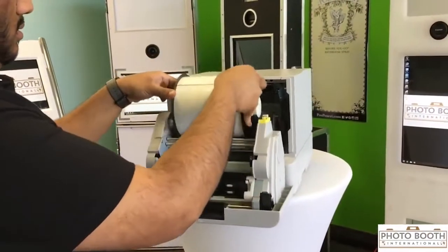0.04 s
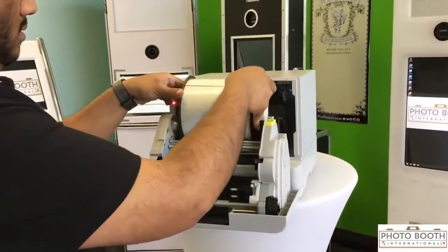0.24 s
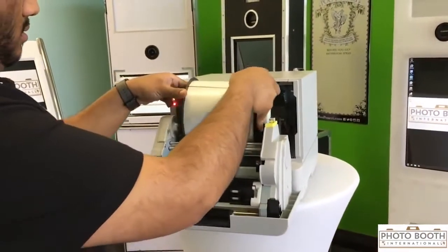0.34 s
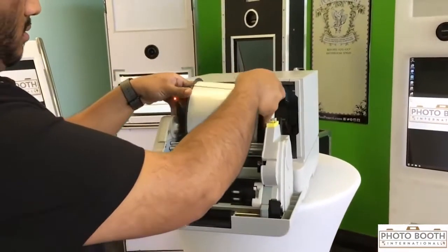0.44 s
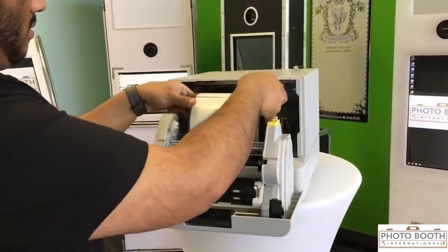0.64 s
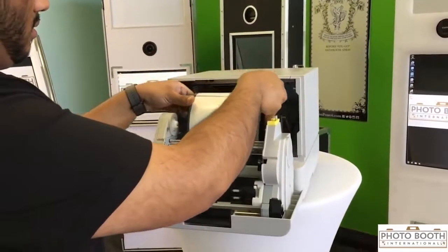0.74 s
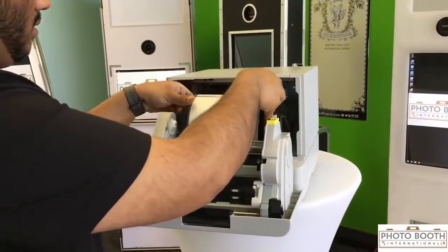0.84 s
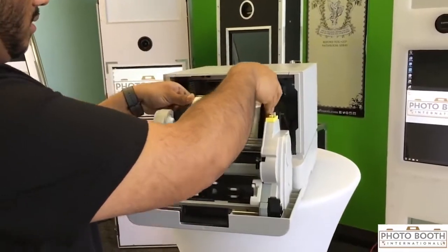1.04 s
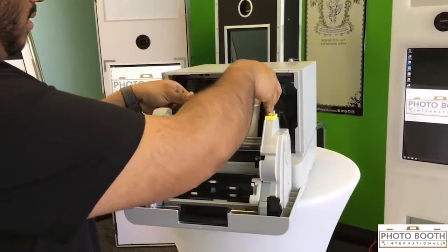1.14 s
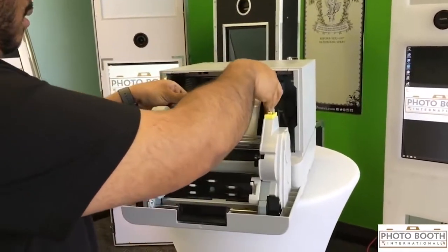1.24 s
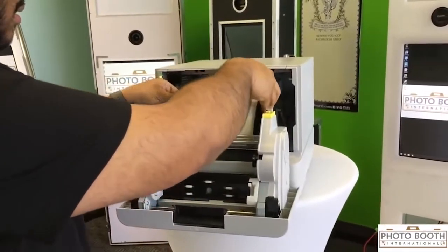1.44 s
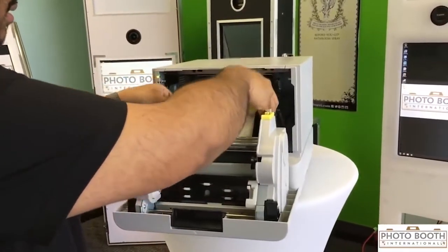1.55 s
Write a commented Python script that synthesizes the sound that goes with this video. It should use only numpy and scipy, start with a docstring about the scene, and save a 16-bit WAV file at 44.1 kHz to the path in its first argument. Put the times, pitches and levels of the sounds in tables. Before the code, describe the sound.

Plastic clacks sound in a small room as a paper roll is lowered into a printer. It seats with a sharp snap and a low bump, then hands nudge it with soft taps and faint squeaking, over quiet ventilation.

```python
"""Small showroom: a paper roll on plastic flanges is lowered into a printer.
The flanges clack twice against the guides, then the roll drops into its seat with a loud snap and a
rumble of the case. Each clack is a noise crack plus ringing plastic modes. Hands nudge the roll home
with light taps, a stick-slip creak and a thin squeak, over the hum of ventilation."""
import sys
import numpy as np
from scipy import signal
from scipy.fft import rfft, irfft
from scipy.io import wavfile
from scipy.ndimage import uniform_filter1d

SR = 44100
rng = np.random.default_rng(int(sys.argv[2]) if len(sys.argv) > 2 else 0)


def inscribe(sig):
    """Save sig as 16-bit PCM at rate SR to the path in sys.argv[1].

    A 1-D sig is mono; a 2-D sig holds one channel per row.
    Samples are clipped to [-1, 1] before scaling.
    """
    pcm = np.round(np.clip(np.atleast_2d(sig).T, -1, 1) * 32767)
    wavfile.write(sys.argv[1], SR, pcm.astype(np.int16))


N = 70560
SIZE = 2 ** 14   # samples per impact
T_S = np.arange(N) / SR
AGE_S = T_S[:SIZE]
BINS_HZ = np.maximum(np.arange(SIZE // 2 + 1) * SR / SIZE, 1)
CUTOFF_HZ = 15800
CONTACT_RISE_S = .0014   # bumps and taps

# air noise spectrum: f/Hz, relative level/dB
AIR_SPECTRUM = [(25, -28), (50, -5), (70, 0), (105, -7), (260, -9), (400, -17), (1000, -21), (2000, -31),
                (4000, -35.5), (8000, -45), (15000, -50)]
# ventilation tones: f/Hz, level/dB
HUM_TONES = [(76, -55), (163, -62), (241, -56)]
# roll on case: t/s, level/dB, low-pass f/Hz
BUMPS = [(.001, 4, 200), (.168, 5, 600), (.246, -4, 300), (.624, 11, 130), (.664, 6.5, 520), (.765, 2, 100)]
# light flange taps: t/s, decay/s, knock/dB, body/dB, tick/dB, hollow ring f/Hz
TAPS = [(.0142, .003, -11, -18, -7, 560), (.1625, .004, -6, -17, -20, 540), (.203, .008, -4, -13, -28, 600),
        (.644, .005, 3, -4, -8, 830), (.659, .005, 5, -3, -10, 830), (.709, .004, 4, -11, -29, 570),
        (.729, .003, 3.5, -12, -32, 450), (.957, .005, -12, -7, -11.5, 890),
        (.965, .0045, -11, -6, -12, 1170), (.994, .014, -11, -10, -25, 1090),
        (1.045, .003, -6, -12, -29, 760), (1.054, .008, -11, -16, -24, 780),
        (1.136, .007, -12, -10, -26, 1070), (1.1625, .002, -17, -20, -26, 750),
        (1.188, .003, -20, -26, -27, 900), (1.228, .006, -20, -21, -30, 870),
        (1.282, .008, -11, -18, -34, 560), (1.326, .004, -15, -11, -33, 1350),
        (1.419, .005, -13, -14, -29, 1220), (1.556, .004, -19, -16, -29, 1700),
        (1.594, .005, -19, -17, -27, 1200)]
# clacks: t/s, level/dB, rise/s, decay/s, room/dB
FIRST_CLACK = (.2265, 1, .0012, .0046, -8)
SECOND_CLACK = (.4133, 1.5, .0013, .0036, -6.5)
SEAT_CLACK = (.6074, .7, .0027, .0038, -4)
# contact noise spectra: f/Hz, gain/dB
BUMP_SPECTRUM = [(25, -24), (70, 6), (130, -3), (220, 2), (400, 1), (900, -3)]
TAP_SPECTRUM = [(50, -6), (200, 0), (1200, -1), (1900, -4), (3400, 0), (4800, -9), (6500, 0), (9000, -15),
                (15000, -26)]
FIRST_CRACK = [(60, -8), (800, 0), (1400, -9), (2300, 1), (5500, -2), (8000, -2), (10000, -12),
               (15000, -11)]
SECOND_CRACK = [(480, -8), (850, 4), (1350, -1), (2500, 1), (7000, -6.5), (15000, -13)]
SEAT_CRACK = [(50, 0), (200, 11.5), (1000, 12), (1900, 7.5), (3300, 14.5), (4600, 7.5), (7500, 10.5),
              (11000, 0.5), (15000, -4)]
# modes of the struck plastic: f/Hz, relative level/dB, t60/s
TAP_MODES = [(1090, -23, .08), (3220, -24, .024), (3380, -27, .024), (5450, -31, .016), (6700, -31, .016)]
FIRST_MODES = [(810, -34, .06), (2400, -38, .03), (3690, -26, .035), (3820, -25, .035), (4500, -28, .028)]
SECOND_MODES = [(790, -42, .05), (1095, -37, .07), (1680, -38, .06), (2900, -26, .028), (3150, -21.5, .027),
                (4172, -42, .09), (5250, -34, .03), (6700, -33, .03)]
SEAT_MODES = [(205, -28, .13), (394, -40, .27), (447, -38, .22), (565, -43, .25), (835, -31, .1),
              (1085, -25, .08), (2357, -13.5, .03), (2935, -14, .028), (3165, -12.5, .028),
              (3347, -29, .08), (3560, -33, .11), (6755, -6, .017), (6790, -44, .2), (10150, -17, .016)]
# flange stick-slip tracks: t/s, slip rate/Hz, level/dB
CREAK = [(1.121, 745, -65), (1.126, 730, -47), (1.139, 705, -48), (1.152, 700, -62)]
SQUEAK = [(1.359, 6100, -79), (1.367, 5600, -62), (1.373, 5400, -71), (1.381, 5700, -61),
          (1.386, 4500, -58), (1.391, 3950, -70), (1.396, 3600, -56), (1.401, 3950, -70),
          (1.407, 4450, -56), (1.423, 3800, -68)]
CHIRR = [(1.486, 1095, -72), (1.494, 1100, -62), (1.53, 1100, -64)]
# sliding strokes of the roll: centre t/s, half length/s, level/dB
SLIDES = [(1.395, .02, -60), (1.417, .008, -55), (1.51, .02, -64)]
# friction spectra: f/Hz, relative level/dB
CREAK_SPECTRUM = [(700, 3), (1400, -14), (2100, -18), (2900, -6), (4300, -6), (5000, -18), (6300, -13),
                  (15000, -29)]
SQUEAK_SPECTRUM = [(3600, 0), (11000, -2), (15000, -11)]
CHIRR_SPECTRUM = [(1100, -11), (2200, -12), (4400, 0), (5500, -7), (7700, -5), (15000, -14)]
SLIDE_SPECTRUM = [(300, -12), (2500, -3), (7000, 0), (15000, -5)]
# room decay: f/Hz, t60/s
ROOM_T60 = [(100, .38), (400, .38), (1200, .31), (7000, .25), (14000, .19)]
# room echo spectrum: f/Hz, gain/dB
ROOM_SPECTRUM = [(100, 2), (500, 3), (4000, -2), (15000, -5)]


def from_db(db):
    """Decibels to gain."""
    return 10 ** (np.asarray(db) / 20)


def unit_rms(x):
    """Scale to unit power."""
    return x / np.sqrt(np.mean(x ** 2) + 1e-20)


def at_hz(table, hz=BINS_HZ):
    """Interpolate on a log-frequency axis."""
    points_hz, values = np.transpose(table)
    return np.interp(np.log(hz), np.log(points_hz), values)


def colour(x, gain_db):
    """Minimum-phase filter, one gain per bin."""
    cepstrum = irfft(np.log(from_db(gain_db)))
    cepstrum[1:SIZE // 2] *= 2
    cepstrum[SIZE // 2 + 1:] = 0
    impulse = irfft(np.exp(rfft(cepstrum)))[:SIZE // 2]
    return signal.fftconvolve(x, impulse)[:len(x)]


def with_spectrum(burst, spectrum_db, smooth_bins):
    """Flatten a burst's smoothed spectrum, then impose the given one."""
    power = uniform_filter1d(abs(rfft(burst)) ** 2, size=smooth_bins)
    return colour(burst, spectrum_db - 10 * np.log10(np.maximum(power, 1e-9)))


def drift(rate_hz):
    """Random wander, unit RMS."""
    hz = np.arange(N // 2 + 1) * SR / N
    return unit_rms(irfft(rfft(rng.standard_normal(N)) / (1 + (hz / rate_hz) ** 2), N))


def place(x, t_s):
    """Start a sound at t_s."""
    return np.pad(x, (max(int(t_s * SR), 0), N))[:N]


def attack(rise_s):
    """Smooth rise from 0 to 1."""
    return 1 - np.exp(-(AGE_S / rise_s) ** 2)


def decay(t60_s):
    """Fall of 60 dB per t60_s."""
    return np.exp(-np.log(1000) * AGE_S / t60_s)


def in_room(x, room_db, late_db=-23, late_stretch=2.5):
    """Add diffuse echo: a quick decay and a faint slow one, both shorter in the treble."""
    edges_hz = [1, 200, 500, 1000, 2000, 4000, 7000, 11000, SR]
    white = rfft(rng.standard_normal(SIZE))
    tail = 0
    for low_hz, high_hz in zip(edges_hz, edges_hz[1:]):
        t60_s = at_hz(ROOM_T60, np.sqrt(low_hz * high_hz))
        band = irfft(white * (BINS_HZ >= low_hz) * (BINS_HZ < high_hz))
        tail += band * (decay(t60_s) + from_db(late_db) * decay(t60_s * late_stretch))
    echo = with_spectrum(tail * attack(rise_s=.007), room_db + at_hz(ROOM_SPECTRUM), smooth_bins=30)
    return x + signal.fftconvolve(x, echo)[:N]


def ventilation(air_db=-52.5, hum_width_hz=5):
    """Soft air noise plus wavering hum tones."""
    air = from_db(air_db) * unit_rms(colour(rng.standard_normal(N), at_hz(AIR_SPECTRUM)))
    hum = 0
    for hz, db in HUM_TONES:
        phase = 2 * np.pi * hz * T_S
        tone = drift(hum_width_hz) * np.sin(phase) + drift(hum_width_hz) * np.cos(phase)
        hum += from_db(db) * unit_rms(tone)
    return air + hum


def contact(rise_s, decay_s, spectrum_db):
    """Brief flurry of tiny impacts, as a noise burst."""
    burst = rng.standard_normal(SIZE) * attack(rise_s) * np.exp(-AGE_S / decay_s)
    return with_spectrum(burst, spectrum_db, smooth_bins=100)


def case_bumps(decay_s=.009):
    """The heavy roll thumps the case; softer contact, less treble."""
    thumps = 0
    for t_s, db, corner_hz in BUMPS:
        rolloff_db = 10 * np.log10(1 + (BINS_HZ / corner_hz) ** 4)
        thumps += place(contact(CONTACT_RISE_S, decay_s, db + at_hz(BUMP_SPECTRUM) - rolloff_db), t_s)
    return in_room(thumps, room_db=-3)


def ringing(modes):
    """Decaying modes of struck plastic, random phases."""
    return sum(from_db(db) * decay(t60_s) * np.sin(2 * np.pi * (hz * AGE_S + rng.random()))
               for hz, db, t60_s in modes)


def flange_taps(knock_hz=350, body_hz=1200, tick_hz=4500, hollow_re_body_db=-26, hollow_t60_s=.028):
    """Flanges rattle on the guides, dull or bright; the spot touched sets the hollow ring's pitch."""
    taps = 0
    for t_s, decay_s, knock_db, body_db, tick_db, hollow_hz in TAPS:
        balance = [(knock_hz, knock_db), (body_hz, body_db), (tick_hz, tick_db)]
        touch = contact(CONTACT_RISE_S, decay_s, at_hz(TAP_SPECTRUM) + at_hz(balance))
        modes = [(hollow_hz, body_db + hollow_re_body_db, hollow_t60_s)]
        modes += [(hz, db + min(body_db, tick_db), t60_s) for hz, db, t60_s in TAP_MODES]
        taps += place(touch + ringing(modes) * attack(decay_s), t_s)
    return in_room(taps, room_db=-5)


def clack(event, crack_spectrum, modes):
    """Hard plastic contact: broad crack plus ringing of the struck part."""
    t_s, db, rise_s, decay_s, room_db = event
    crack = place(contact(rise_s, decay_s, at_hz(crack_spectrum)), t_s)
    ring = place(ringing(modes) * attack(rise_s), t_s)
    ring_room_db = room_db - 3   # ringing parts face the microphone: less echo
    return from_db(db) * (in_room(crack, room_db) + in_room(ring, ring_room_db))


def stick_slip(track, spectrum, jitter=.035, flutter_db=4):
    """Plastic catches and slips at unsteady rate and strength: a stack of harmonics."""
    t_s, hz, db = np.transpose(track)
    moving = (T_S > t_s[0]) & (T_S < t_s[-1])
    slip_hz = np.interp(T_S[moving], t_s, hz) * (1 + jitter * drift(rate_hz=1000)[moving])
    level_db = np.interp(T_S[moving], t_s, db) + flutter_db * drift(rate_hz=160)[moving]
    cycles = np.cumsum(slip_hz) / SR
    tone = 0
    for harmonic, offset in enumerate(rng.random(size=20), 1):
        harmonic_hz = harmonic * slip_hz
        gain = from_db(at_hz(spectrum, harmonic_hz)) * (harmonic_hz < CUTOFF_HZ)
        tone += gain * np.sin(2 * np.pi * (harmonic * cycles + offset))
    return place(unit_rms(tone) * from_db(level_db), t_s[0])


def roll_sliding():
    """Dry sliding: short swells of hiss as the roll is pushed home."""
    strokes = sum(from_db(db) * np.exp(-((T_S - t_s) / half_s) ** 2) for t_s, half_s, db in SLIDES)
    return strokes * unit_rms(colour(rng.standard_normal(N), at_hz(SLIDE_SPECTRUM)))


def scene():
    """All sources, mono."""
    mix = ventilation() + case_bumps() + flange_taps()
    mix += clack(FIRST_CLACK, FIRST_CRACK, FIRST_MODES)
    mix += clack(SECOND_CLACK, SECOND_CRACK, SECOND_MODES)
    mix += clack(SEAT_CLACK, SEAT_CRACK, SEAT_MODES)
    friction = stick_slip(CREAK, CREAK_SPECTRUM) + stick_slip(SQUEAK, SQUEAK_SPECTRUM)
    friction += roll_sliding() + stick_slip(CHIRR, CHIRR_SPECTRUM)
    return (mix + in_room(friction, room_db=-5))[None]


def record(dry):
    """Steep low-pass at CUTOFF_HZ."""
    lowpass = signal.firwin(301, CUTOFF_HZ, fs=SR, window="blackman")
    return signal.fftconvolve(dry, lowpass[None], "same")


dry = scene()
out = record(dry)
inscribe(out)
```